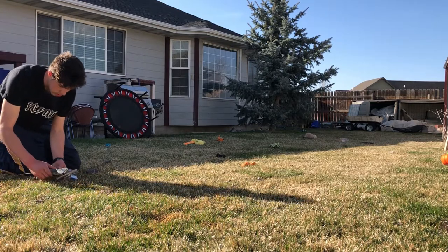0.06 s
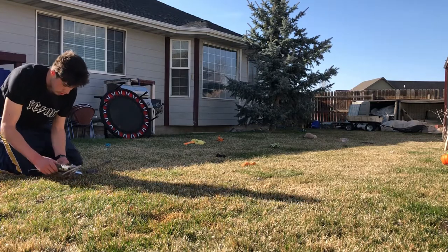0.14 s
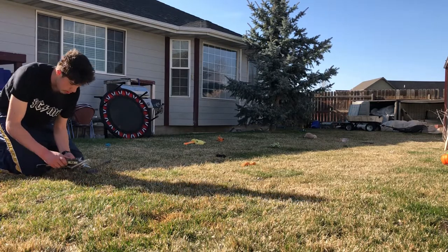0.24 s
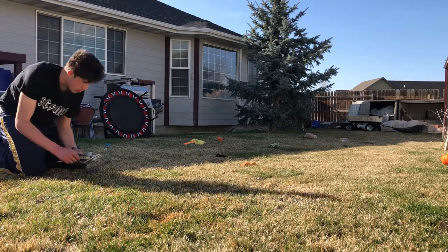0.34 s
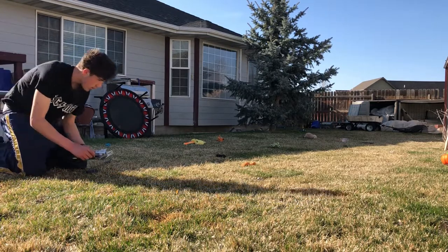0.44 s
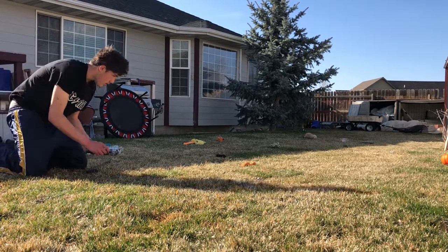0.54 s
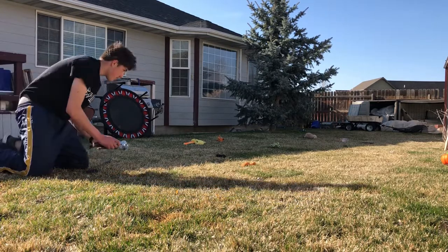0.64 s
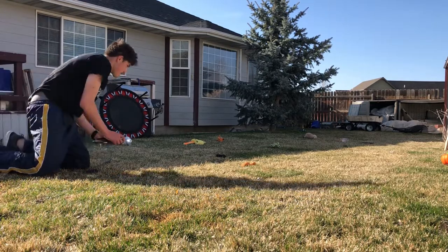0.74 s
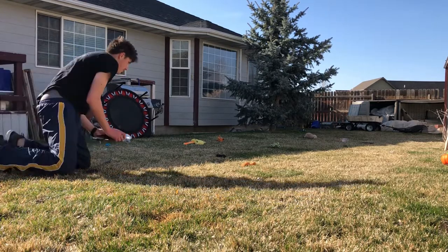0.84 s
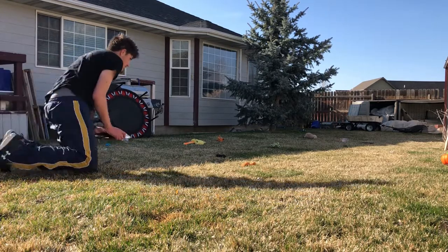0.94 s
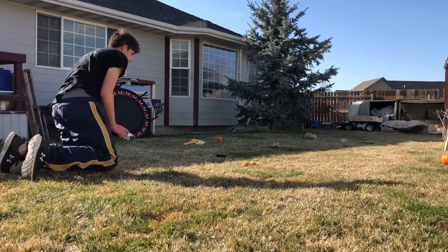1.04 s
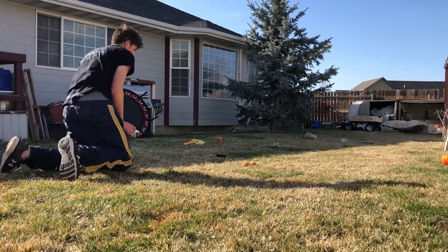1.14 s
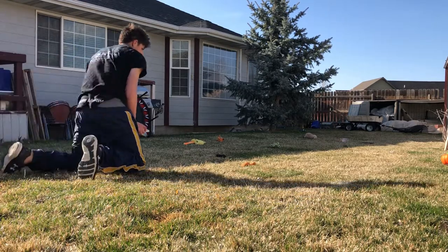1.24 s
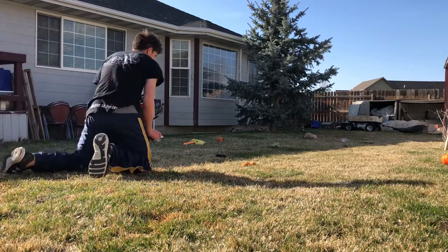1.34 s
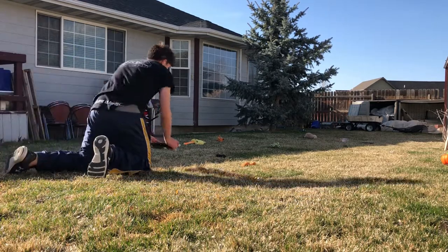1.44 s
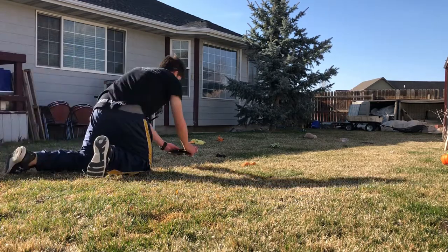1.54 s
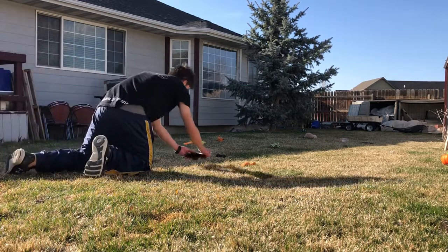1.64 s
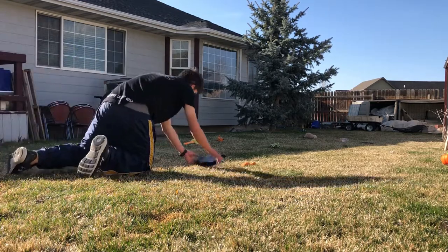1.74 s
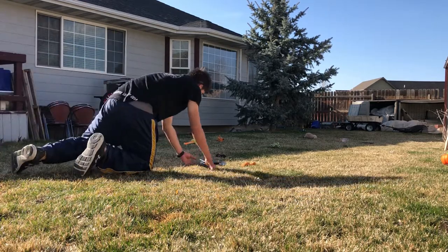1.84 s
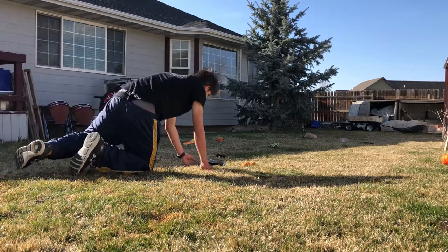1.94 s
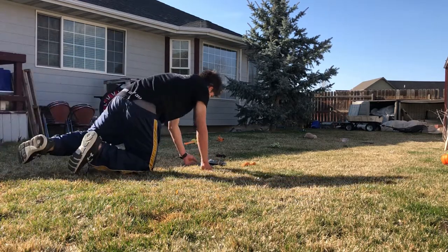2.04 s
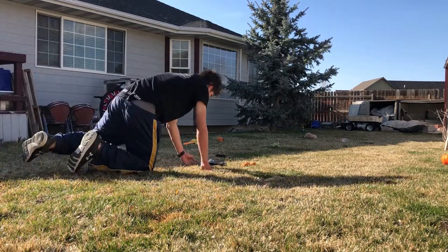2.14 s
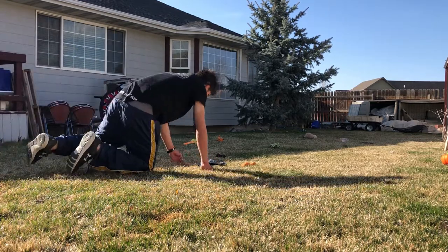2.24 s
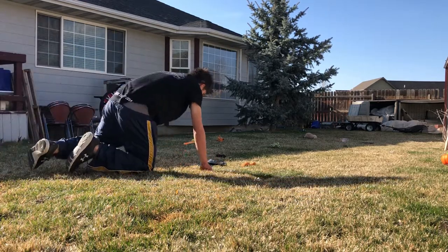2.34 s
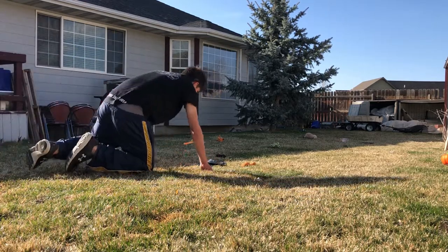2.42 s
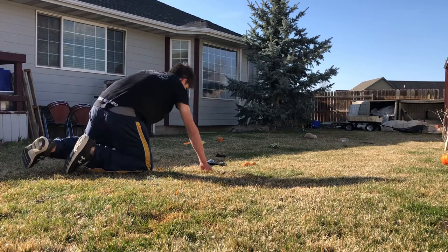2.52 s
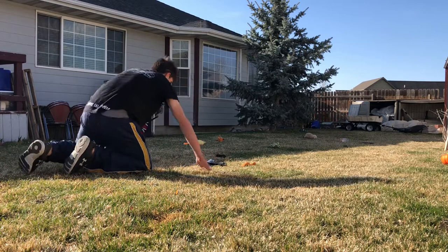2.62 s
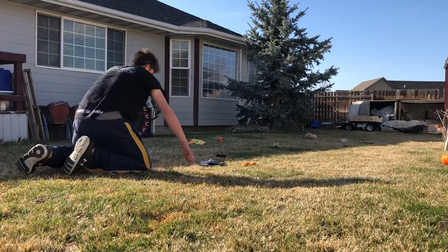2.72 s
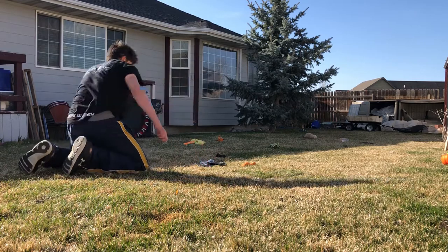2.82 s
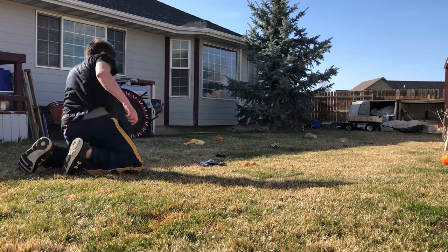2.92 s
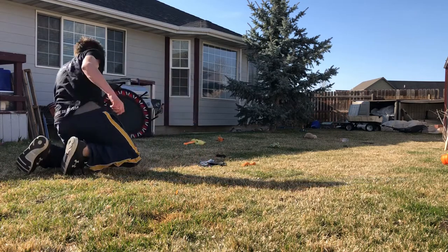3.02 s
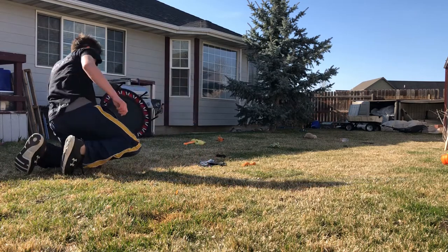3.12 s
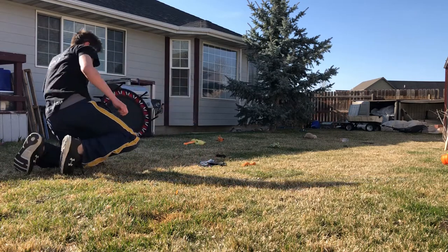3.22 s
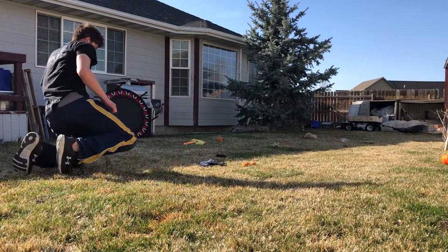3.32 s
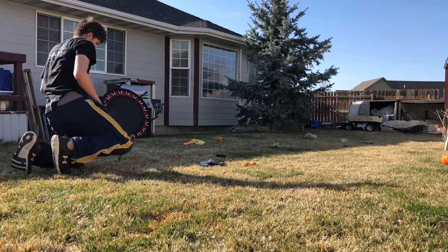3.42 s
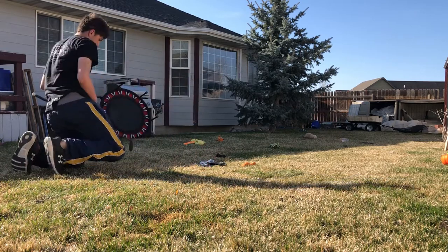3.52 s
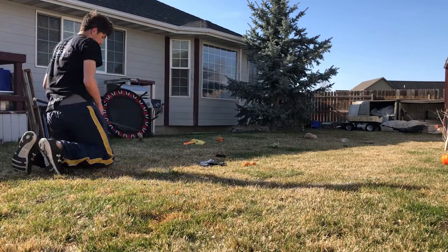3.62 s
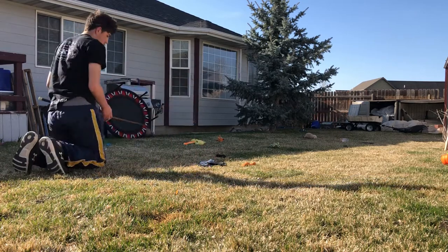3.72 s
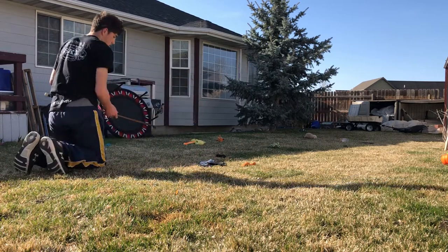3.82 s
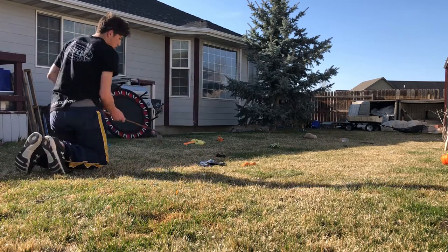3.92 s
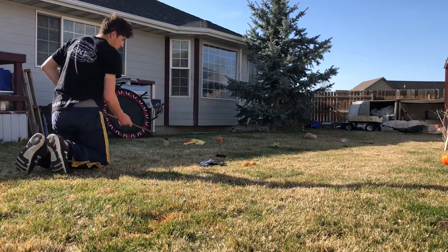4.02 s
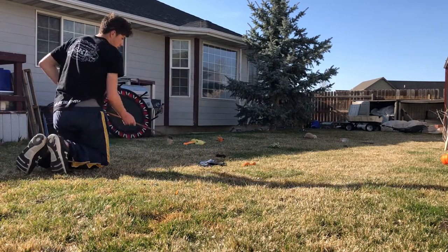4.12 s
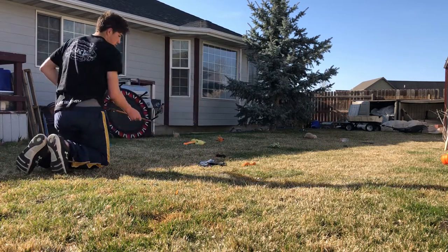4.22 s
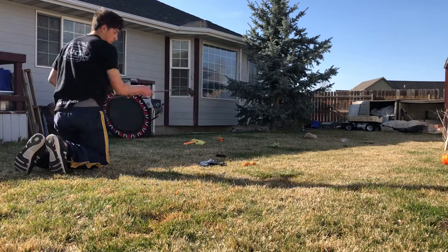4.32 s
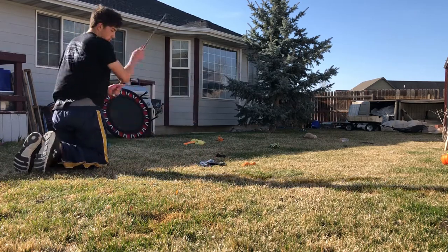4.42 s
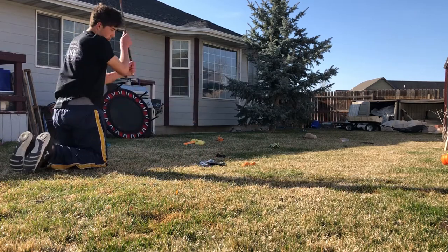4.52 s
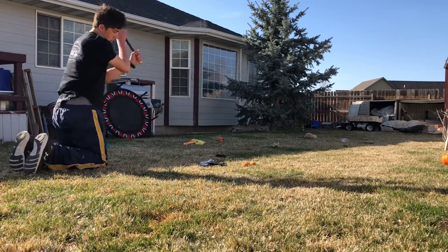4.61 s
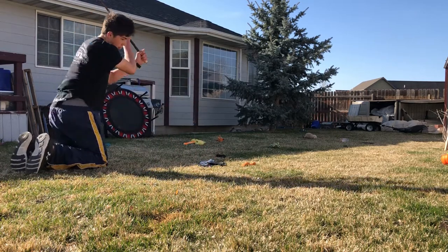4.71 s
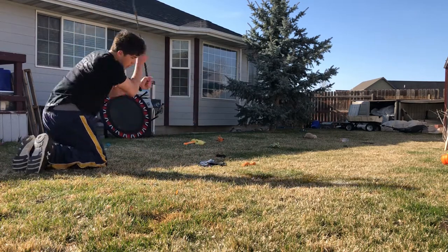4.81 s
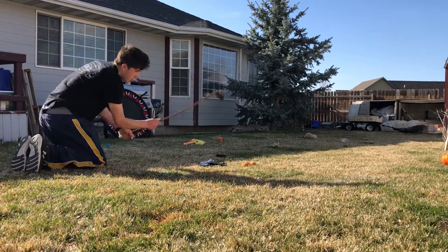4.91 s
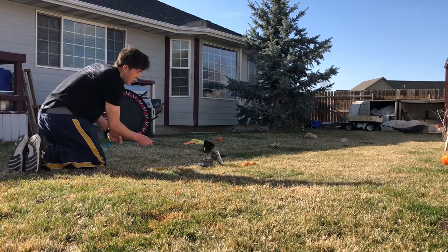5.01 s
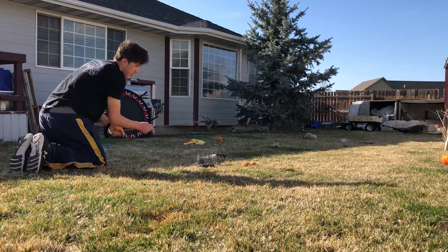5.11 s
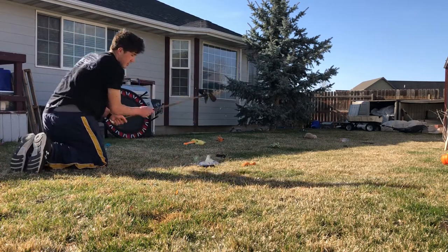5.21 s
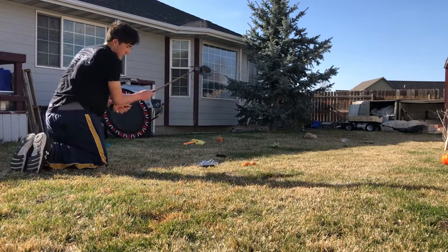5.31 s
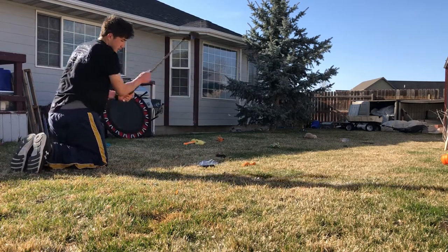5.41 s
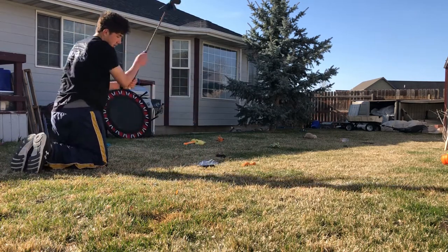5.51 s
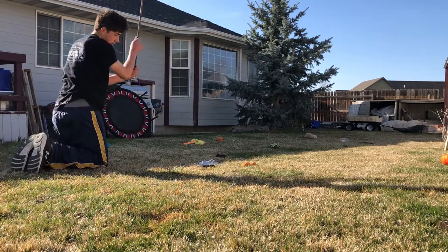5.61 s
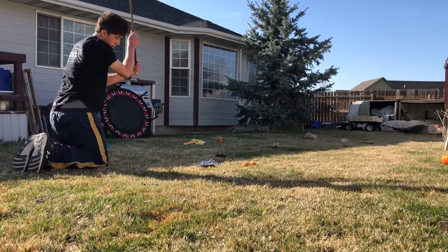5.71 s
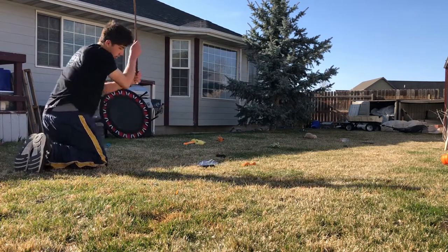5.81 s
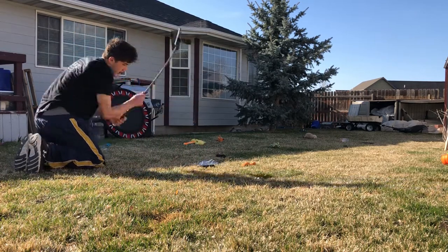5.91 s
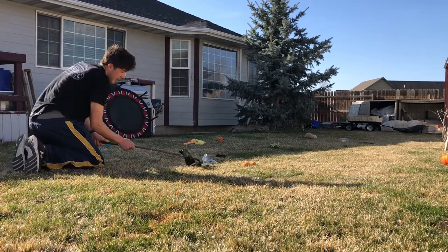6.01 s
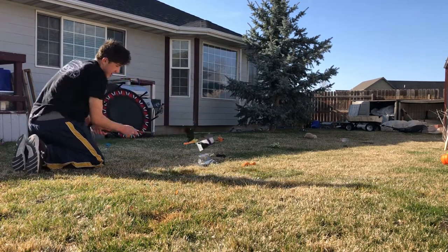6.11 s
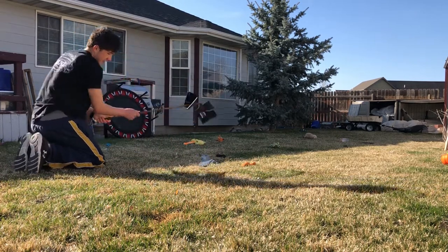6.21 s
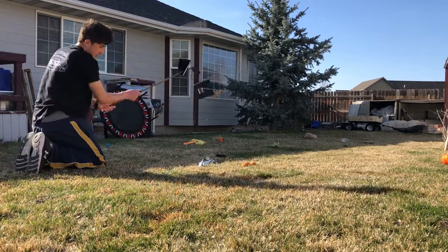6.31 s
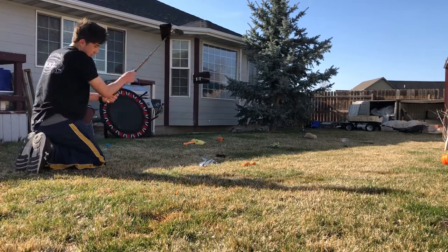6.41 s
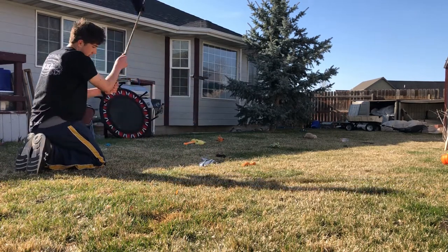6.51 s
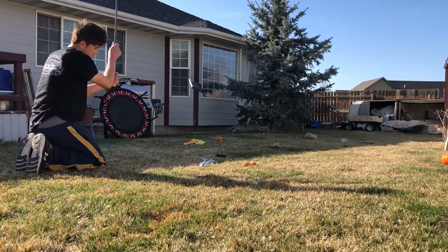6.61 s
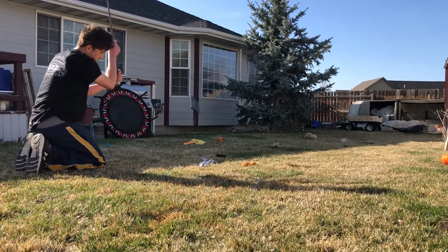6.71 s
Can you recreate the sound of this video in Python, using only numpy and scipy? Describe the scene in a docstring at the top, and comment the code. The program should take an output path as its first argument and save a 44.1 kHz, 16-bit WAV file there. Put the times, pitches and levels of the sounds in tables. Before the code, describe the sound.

Under a low droning propeller plane, someone shifts on dry grass, sets down a rattly gadget, then smashes it twice with sharp, crunching cracks.

```python
"""A golf club smashes a broken gadget twice on a back lawn: sharp noise bursts for the cracks, ringing shards
and turf for the crunch, damped tones for the hollow knocks and thuds.
Plastic pieces tick and ring, metal plates clink, and the house and fence send back echoes.
Behind, someone kneeling shifts on dry grass (shaped noise and tiny snaps), and a propeller plane drones
past overhead (sine waves tied to one sinking shaft speed, with coloured noise)."""
import sys
import numpy as np
from scipy import signal
from scipy.fft import rfft, irfft
from scipy.io import wavfile
from scipy.ndimage import map_coordinates

SR = 44100
rng = np.random.default_rng(int(sys.argv[2]) if len(sys.argv) > 2 else 0)


def int16_out(signal):
    """Quantize to a 16-bit WAV file."""
    q = np.round(np.clip(np.atleast_2d(signal).T, -1, 1) * 32767)
    wavfile.write(sys.argv[1], SR, q.astype(np.int16))


N = 297675
TIME = np.arange(N) / SR


def from_db(db):
    """Decibels to gain."""
    return 10 ** (np.asarray(db) / 20)


def rms_one(x):
    """Scale to unit power."""
    return x / np.sqrt(np.mean(x ** 2) + 1e-20)


def in_time(rows):
    """Read each column of a curve, sample by sample."""
    s, *columns = np.transpose(rows)
    return [np.interp(TIME, s, column) for column in columns]


def at_hz(points, hz):
    """Read a table on a log-frequency axis."""
    f, value = np.transpose(points)
    return np.interp(np.log(np.maximum(hz, 1)), np.log(f), value)


def colour(x, spectrum, size=8192):
    """Causal (minimum-phase) filter with the shape of the spectrum; white noise keeps its power."""
    gain = from_db(at_hz(spectrum, np.fft.rfftfreq(size, 1 / SR)))
    # folding the cepstrum forward in time makes the filter answer as early as it can
    cepstrum = irfft(np.log(gain))
    cepstrum[1:size // 2] *= 2
    cepstrum[size // 2 + 1:] = 0
    response = irfft(np.exp(rfft(cepstrum)))
    return signal.fftconvolve(x, response / np.linalg.norm(response))[:N]


def noise():
    """White noise of unit power."""
    return rng.standard_normal(N)


def drift(rate):
    """Smooth random wander of spread 1 with about `rate` turns a second."""
    coarse = TIME[::20]
    points = rng.standard_normal(N // 50)
    wander = map_coordinates(points, [coarse * rate], order=3, mode="wrap")
    return rms_one(np.interp(TIME, coarse, wander))


def grains(per_s, spread_db):
    """Random tiny snaps of uneven size, unit power."""
    sizes = from_db(spread_db * np.minimum(rng.exponential(1, N), 4))
    signs = rng.choice([-1, 1], N)
    happens = rng.random(N) < per_s / SR
    return rms_one(sizes * signs * happens)


def fall(age, t60):
    """Exponential fade that drops 60 dB in t60 seconds."""
    return np.exp(-np.log(1000) * age / t60)


def decay(start, t60, hold=0):
    """Envelope that jumps to 1, holds, then dies away."""
    age = TIME - start
    return (age >= 0) * np.exp(-np.log(1000) * np.clip((age - hold) / t60, 0, 2))


def add(track, s, piece):
    """Mix a short piece into a track at time s."""
    at = int(s * SR)
    track[at:at + len(piece)] += piece[:N - at]


def bursts(times, levels_db, t60s):
    """Each burst is a rush of noise that swells in a fraction of a millisecond and dies fast."""
    power, age = np.zeros(N), np.arange(SR // 10) / SR
    swell = 1 - np.exp(-age / 0.00018)
    for s, db, t60 in zip(times, levels_db, t60s):
        add(power, s, (from_db(db) * swell * fall(age, t60)) ** 2)
    return np.sqrt(power) * noise()


def ring(x, hz, t60):
    """One mode: a unit click sets a sine ringing, about 1 high at first."""
    r, w = np.exp(-np.log(1000) / (t60 * SR)), 2 * np.pi * hz / SR
    return signal.lfilter([0, np.sin(w)], [1, -2 * r * np.cos(w), r * r], x + 1e-18)


def resonate(x, modes, pitch=1, sustain=1):
    """Pass a force through modes, all scaled alike in pitch and ring time; white noise keeps its power."""
    click = np.zeros(SR // 5)
    click[0] = 1
    response = np.zeros(len(click))
    for k, (hz, t60, db) in enumerate(modes):
        tone = rms_one(ring(click, pitch * hz, sustain * t60))
        response += (-1) ** k * from_db(db) * tone
    return signal.fftconvolve(x, response / np.linalg.norm(response))[:len(x)]


def knock(hz, t60):
    """A well-damped tone pushed by a soft contact, which takes about half a cycle to build up."""
    age = TIME[:SR // 5]
    build_up = 1 - np.exp(-2 * hz * age)
    return np.sin(2 * np.pi * hz * age) * build_up * fall(age, t60)


def passing(top_db, loudest_s, steepness):
    """Level in dB of a sound that flies by in a straight line and falls off with distance."""
    pass_s = 1.484  # nearest distance over speed: how slowly the plane swells and fades
    distance = np.hypot(1, (TIME - loudest_s) / pass_s)
    return top_db - 20 * steepness * np.log10(distance)


def propeller(turn):
    """Blade tone, main drone and other engine lines, each wavering on its own in the moving air."""
    # main drone, the second blade harmonic: t/s, level/dB
    drone_curve = [(0, -73), (.8, -42), (1.15, -38.5), (1.47, -40), (1.67, -55.5), (1.87, -37), (2.12, -44),
                   (2.5, -37.5), (2.78, -45.5), (3.72, -44.5), (4.22, -63.5), (4.75, -60), (5.2, -57),
                   (6.75, -62)]
    # pass of the blade tone: level at its loudest/dB, t when loudest/s, steepness of the fade
    blade_pass = (-43.5, 2.2, 1.91)
    # other strong engine lines: shaft order, level at its loudest/dB, t when loudest/s, steepness of the fade
    engine_lines = [(3, -52, 2.2, 2.7), (3.2, -48, 1.1, 2.3), (5, -51.5, 1.75, 1.16), (6, -53, 0.46, 2.3)]
    blade_order, drone_order = 2, 4  # cycles per turn of the shaft
    # the blade tone also fades in and out slowly
    period_s, deepest_s, echo = 1.68, 1.89, 0.91
    drone_db, = in_time(drone_curve)
    cycle = np.exp(2j * np.pi * (TIME - deepest_s) / period_s)
    fade = np.abs(1 - echo * cycle) / (1 + echo)
    # the fades set in as the plane comes overhead
    fade = np.where(TIME > deepest_s - period_s / 2, fade, 1)
    lines = [(blade_order, passing(*blade_pass) + 20 * np.log10(fade)), (drone_order, drone_db)]
    for order, *flight in engine_lines:
        lines.append((order, passing(*flight) + 4.3 * drift(6)))
    out = np.zeros(N)
    for order, db in lines:
        out += from_db(db + 1.0 * drift(9)) * np.sin(order * turn + 0.08 * drift(14.0))
    return np.sqrt(2) * out


def plane():
    """Engine lines share one sinking (Doppler-shifted) shaft speed; rumble, rasp and rush are noise."""
    # shaft speed as heard, sinking as the plane passes: t/s, f/Hz
    shaft = [(0, 41.94), (1.45, 40.87), (1.9, 40.83), (3.4, 40.1), (4.0, 38.85), (5.4, 37.88), (6.75, 35.4)]
    # weaker exhaust lines: shaft order, level against the exhaust/dB
    exhaust_lines = [(3.5, -22), (4.5, -24), (5.5, -27), (6.4, -12), (7, -24.5), (7.7, -20), (8, -17.5)]
    # passes of the exhaust, its rasp and the thin whine, each beamed its own way; the rasp is beamed
    # backwards and heard just after the plane goes over: level at its loudest/dB, t when loudest/s, steepness
    exhaust_pass = (-45.5, 1.78, 1.29)
    rasp_pass = (-57.5, 2.76, 16)
    whine_pass = (-62, 2.3, 3.6)
    # air rushing round the plane: t/s, level/dB
    rush_curve = [(0, -54), (.9, -52), (1.5, -48), (2.15, -52), (2.8, -50.5), (3.4, -53.5), (4.25, -59),
                  (4.9, -60), (5.95, -61), (6.75, -68)]
    # tone colours of the noises: f/Hz, relative level per Hz/dB
    rumble_colour = [(20, -35), (45, -15.5), (70, -8.5), (100, -3.5), (135, -1), (220, -2), (270, -13),
                     (360, -25.5), (600, -23), (2000, -74.5)]
    rush_colour = [(100, 2), (350, 4.5), (600, -1), (830, 5.5), (1020, 3), (1170, 2.5), (1500, 0),
                   (2100, -6.5), (2850, -7), (3400, -14.5), (6000, -22.5), (16000, -45)]
    rasp_colour = [(700, -26), (1200, 4.5), (1700, 2.5), (2900, 1.5), (3500, -21), (4700, -6), (8000, -25)]
    # high shaft orders that carry the engine's buzz
    buzz_orders = (18, 20, 22, 23, 25, 28, 29, 30, 33, 35)
    whine_order = 29

    shaft_hz, = in_time(shaft)
    rush_db, = in_time(rush_curve)
    turn = 2 * np.pi * np.cumsum(shaft_hz) / SR
    exhaust = np.zeros(N)
    for order, db in exhaust_lines:
        exhaust += from_db(db + 4.0 * drift(4.22)) * np.sin(order * turn + 1.15 * drift(4.1))
    exhaust += colour(noise(), rumble_colour)
    exhaust *= from_db(passing(*exhaust_pass))
    # high orders swell and vanish in the turbulence: a faint buzz inside the rush
    buzz = rms_one(sum(drift(7) * np.sin(order * turn + drift(6)) for order in buzz_orders))
    air = colour(noise(), rush_colour) + from_db(-11) * buzz
    rush = from_db(rush_db + 0.72 * drift(14)) * air
    rasp = from_db(passing(*rasp_pass) + 1.9 * drift(24)) * colour(noise(), rasp_colour)
    whine_level = np.sqrt(2) * from_db(passing(*whine_pass) + 3.8 * drift(7.4))
    whine = whine_level * np.sin(whine_order * turn + 1.8 * drift(28))
    return propeller(turn) + exhaust + rush + rasp + whine


def grass():
    """Cloth hisses as the weight shifts, dry blades crackle, and now and then a stalk snaps."""
    # knees and clothes moving: t at the height of the move/s, relative level/dB, time to swell or fade/s
    moves = [(.25, -67.5, 0.061), (0.501, -63, 0.11), (.85, -63, 0.081), (1.19, -68.5, 0.12),
             (1.39, -62, 0.13), (1.84, -61, 0.058), (2.03, -67.5, 0.052), (2.66, -70, 0.26),
             (2.91, -56.5, 0.055), (3.03, -62, 0.028), (3.16, -67.5, 0.04), (3.31, -69.5, 0.056),
             (3.42, -70.5, 0.021), (3.745, -60.5, 0.045), (3.93, -71.5, 0.12), (4.49, -69, 0.094),
             (4.86, -71, 0.2), (5.25, -67, 0.086), (6.0, -71.5, 0.12), (6.35, -72, .07)]
    # tone colour of the rustle: f/Hz, relative level per Hz/dB
    rustle_colour = [(300, 7.5), (1500, 4), (3500, 1.5), (6000, 3), (9000, 1), (13000, -1), (16000, -4)]
    still_db = -81.5  # faint hiss between the moves, on the same relative scale
    power = np.full(N, from_db(still_db) ** 2)
    for middle, db, swell in moves:
        power += (from_db(db) / np.cosh((TIME - middle) / swell)) ** 2
    hiss = 1.55 * noise()
    crackle = 0.63 * grains(per_s=2200, spread_db=15.5)
    stalks = 0.147 * grains(per_s=33, spread_db=4.5)
    return np.sqrt(power) * colour(hiss + crackle + stalks, rustle_colour)


def yard(x):
    """A few wall slaps and a thin scattered tail with its own fading time in each band."""
    # how long scattered sound lingers: f/Hz, time to fade by 60 dB/s
    yard_t60 = [(200, 0.7), (1000, 0.3), (3000, 0.57), (6000, 0.45), (10000, 0.09), (16000, 0.29)]
    # echoes off the house and fence: delay/s, level/dB
    walls = [(0.0167, -24.5), (0.022, -20.5), (0.034, -29), (.069, -31), (0.113, -31)]
    age = TIME[:SR]
    response, edges = np.zeros(SR), np.geomspace(100, 18000, 10)
    for low, high in zip(edges, edges[1:]):
        band_filter = signal.butter(2, [low, high], "band", fs=SR, output="sos")
        band = signal.sosfilt(band_filter, rng.standard_normal(SR))
        response += band * fall(age, at_hz(yard_t60, np.sqrt(low * high)))
    response *= np.clip(age / 0.041, 0, 1)  # the scatter builds up over 41 ms
    response *= from_db(-16.0) / np.linalg.norm(response)
    for delay, db in walls:
        response[int(delay * SR)] += from_db(db)
    return signal.fftconvolve(x, response)[:N]


def metal():
    """Each plate landing rings and jingles until the grass damps it; chattering contact roughens the ring."""
    # small plates bouncing: t/s, relative level/dB, time until the grass stops the ring/s,
    # pitch ratio, ring against jingle/dB
    plate_landings = [(2.0055, -40, .007, 0.9, -13), (2.0115, -49, .005, 0.85, -17),
                      (2.04, -55, .006, 0.9, -14), (5.332, -29, 0.0066, 1.01, -19),
                      (5.3496, -19.5, 0.077, 1.006, -13), (5.377, -34, .03, 1, -13),
                      (5.53, -43, .006, 1, -16.5), (6.2805, -26.5, 0.0066, .965, -14.5)]
    # modes of a plate at pitch ratio 1: f/Hz, relative level/dB, time to fade by 60 dB when free/s
    plate_modes = [(4470, -23.5, .5), (5000, -17, .5), (5730, -17, .09), (6000, -3, .06), (6070, 6, 0.09),
                   (6220, -22, .2), (7477, -20, .45), (8500, -14, .14), (9240, -16, .17), (9260, -8, 0.2),
                   (9800, -17, .2), (10300, -6, .18), (10900, -15, .25), (13200, -10, 0.2),
                   (13394, -9, 0.19), (14013, -14, .15), (15150, -12, .14), (15455, -11, .14)]
    out, age = np.zeros(N), TIME[:SR // 3]
    jingle_colour = [(1500, -9.5), (3500, -3.5), (5500, 4.0), (8000, 3.5), (13000, 6.0), (16000, -4)]
    jingle = colour(noise(), jingle_colour)
    hz, mode_db, t60 = np.transpose(plate_modes)[:, :, None]
    chatter = 1 + .12 * drift(400)
    for start, db, free, pitch, ring_db in plate_landings:
        # every landing excites the modes a little differently
        uneven_db = mode_db + rng.standard_normal(hz.shape)
        strength = from_db(uneven_db + ring_db) * rng.choice([-1, 1], hz.shape)
        tones = np.sum(strength * np.sin(2 * np.pi * pitch * hz * age) * fall(age, t60), axis=0)
        damping = decay(0, 0.064, hold=free)[:len(age)]
        add(out, start, from_db(db) * tones * damping)
        tick_and_tail = from_db(-13.5) * decay(start, 0.04) + from_db(-24.0) * decay(start, 0.27)
        out += from_db(db) * jingle * decay(start, 0.13, hold=free) * tick_and_tail
    return out * chatter


def plastic():
    """Ticks ring at their own pitches, two as wall echoes; the shell scrapes and loose parts chatter."""
    # pieces knocking and landing; the ticks at 5.1345 and 6.1665 s are echoes of the blows off a wall:
    # t/s, relative level/dB, body against treble/dB, time for the tick to fade by 60 dB/s, pitch ratio
    clacks = [(1.813, -40, -20, 0.046, 1), (1.824, -30.5, -24, .04, 1), (1.8308, -28.5, -33, .039, 1),
              (1.8405, -25.5, -12, 0.018, .93), (1.8465, -25, -13, .015, 0.98),
              (1.8685, -25, -5.5, 0.019, 1.05), (1.8755, -32, -9, .02, 1.03), (1.895, -39, -24, .023, 1),
              (1.9125, -38, -18, .015, 1), (1.951, -42.5, -1, .015, .9), (1.9796, -33, -30, 0.015, 1),
              (2.0042, -36, -30, 0.023, 1), (2.039, -44, -26, .025, 1), (5.0655, -21, -8, .015, 0.82),
              (5.0914, -26.5, -7, 0.019, 1.1), (5.1345, -36, -2.5, .035, 1.25),
              (5.2445, -33, -18, 0.037, 1), (5.3148, -36, -18, 0.074, 1.2),
              (5.9218, -24.5, -11.5, 0.021, .97), (5.986, -47, -1.5, 0.022, .95),
              (6.03, -38.5, -7, .015, 1), (6.123, -34, -14, .014, 1), (6.1665, -34, -10, .012, 1.1),
              (6.189, -40, -7, .01, 1), (6.2112, -25.5, -7.5, 0.017, 1.15), (6.2148, -25, -12, 0.01, 1.05),
              (6.237, -35, -4, .012, 1.13), (6.25, -45, -3, 0.011, 1.1), (6.2612, -35, -4.5, 0.012, 1),
              (6.2695, -33, -7, .012, .97), (6.2794, -24, -16, 0.033, 1.1), (6.288, -31, -20, .014, 1.3),
              (6.392, -45, -30, .025, 1)]
    # loose parts chattering as the shell is set down, kicked up by the club and tumbling through the air:
    # t/s, level/dB, length/s, time to fade by 60 dB after that/s
    rattles = [(1.81, -58, 0.096, 0.2), (6.076, -35.5, 0.019, 0.076), (6.156, -49, 0.135, 0.03)]
    # shell dragging through stiff grass as it is set down: t at the hardest push/s, level/dB,
    # time to swell or fade/s
    scrapes = [(1.842, -49, 0.012), (1.895, -59, 0.034)]
    # modes of the loose shell, before pitch and ring-time ratios: f/Hz, time to fade by 60 dB/s,
    # relative level/dB
    shell = [(527, .045, 2), (1010, .009, 1.5), (1706, 0.024, 8), (1940, 0.011, 3.5), (2224, .016, 3),
             (2590, 0.015, 3), (3290, 0.02, -1), (3710, 0.015, 3.5), (4320, 0.018, -1), (5560, .006, 0)]
    # tone colours of the ticks and the scrape: f/Hz, relative level per Hz/dB
    clack_colour = [(1500, -29.5), (3000, 1.5), (4500, 7), (6500, 9), (9000, 7.5), (13000, 2), (16000, 1.5)]
    scrape_colour = [(400, -14), (1100, 2), (1800, -1), (3500, -2), (5500, -4), (9000, -5), (16000, -9)]
    free_ring = 2.1  # clear of the grass, the shell rings this many times longer

    s, db, _, t60s, _ = np.transpose(clacks)
    out = colour(bursts(s, db - 7.5, t60s), clack_colour)
    shaking = np.zeros(N)
    for start, level_db, length, t60 in rattles:
        shaking += from_db(level_db) * decay(start, t60, hold=length)
    out += resonate(shaking * grains(per_s=300, spread_db=3.0), shell, sustain=free_ring)
    push = np.zeros(N)
    for middle, level_db, swell in scrapes:
        push += from_db(level_db) / np.cosh((TIME - middle) / swell)
    out += push * colour(grains(per_s=4300, spread_db=2.0), scrape_colour)
    age = TIME[:SR // 8]
    for start, peak_db, body_db, t60, pitch in clacks:
        fading = from_db(peak_db + body_db + 0.5) * fall(age, t60)
        force = fading * rng.standard_normal(len(age))
        add(out, start, resonate(force, shell, pitch))
    return out


def shards(start, length, count=110):
    """Each shard snaps off at its own moment, pitch and strength; the late ones tend to be weaker."""
    low_hz, high_hz, t60_s = 1101, 12000, .03
    level_db, spread_db = -4.5, 9  # level against the splinters, and how far it strays either way
    span_s = .13  # they keep snapping for this long
    # they weaken as the club slows, and faster still once it has stopped (dB per s)
    slowing_db_per_s, stopped_db_per_s = 109.5, 167.5
    out = np.zeros(N)
    for moment, size, strength in rng.random((count, 3)):
        delay = span_s * moment
        hz = low_hz * (high_hz / low_hz) ** size
        fade_db = slowing_db_per_s * delay + stopped_db_per_s * max(delay - length, 0)
        db = level_db + spread_db * (2 * strength - 1) - fade_db
        add(out, start + delay, from_db(db) * knock(hz, t60_s))
    return out


def knocks():
    """Damped tones: the casing knocks hollow at shifting pitches, once as an echo; the ground stops the club."""
    # hollow knocks of the casing under the club head, and a faint echo of the first blow off a wall
    # at 5.135 s: t/s, level/dB, f/Hz, time to fade by 60 dB/s
    hollows = [(5.0235, -19, 555, 0.018), (5.0645, -23, 785, 0.031), (5.135, -39, 720, 0.035),
               (5.9214, -29, 761, 0.018), (6.055, -28.5, 697, 0.012), (6.0775, -23, 640, 0.016)]
    # modes of that knock: multiple of the pitch, relative level/dB
    hollow_modes = [(1, 0.5), (1.5, -5), (1.96, -6.5), (4.85, -19.5)]
    # club head stopped by the ground: t/s, level/dB, f/Hz, time to fade by 60 dB/s
    thuds = [(5.04, -24.5, 136, .07), (6.072, -14, 101.3, 0.047)]
    out = np.zeros(N)
    for s, db, hz, t60 in hollows:
        for multiple, mode_db in hollow_modes:
            add(out, s, from_db(db + mode_db) * knock(multiple * hz, t60))
    for s, db, hz, t60 in thuds:
        add(out, s, from_db(db) * knock(hz, t60))
    return out


def club():
    """Swish, crack of the casing, then the crunch and thud of the head digging in."""
    # club head breaking the casing: t/s, level/dB, time for the crack to fade by 60 dB/s,
    # level of the dull knock/dB
    cracks = [(5.0228, -0.5, 0.009, -23), (5.026, -14.5, 0.025, -27.5), (6.053, -7, 0.016, -27),
              (6.056, -20, 0.012, -30), (6.0657, -21, 0.02, -32.5), (6.0715, -13.5, 0.026, -38),
              (6.076, -15.5, 0.012, -24)]
    # splinters and turf crushed under the club: t/s, splinter level/dB, length/s, turf level/dB,
    # earth thud level/dB
    crunches = [(5.038, -29.5, 0.044, -38, -41.5), (6.063, -27, 0.037, -37.5, -32)]
    # the downswing: t of the impact/s, level/dB
    swings = [(5.023, -47), (6.052, -45.5)]
    # hollow tones of the casing pressed into the turf: f/Hz, time to fade by 60 dB/s, relative level/dB
    turf_tones = [(152, 0.048, -11), (245.2, 0.054, 5), (347, 0.077, -0.5), (510, 0.0896, -8.5),
                  (660, 0.0099, 0.5), (860, 0.03, 0), (1120, 0.027, -9)]
    # tone colours of the crack, dull knock, splinters and earth thud: f/Hz, relative level per Hz/dB
    crack_colour = [(200, -27), (1000, -19.5), (2300, -16.5), (4000, -1), (5500, 3.5), (6800, 3),
                    (9000, 3.5), (13000, -2.5), (16000, 2.5)]
    knock_colour = [(60, -25.5), (250, -19.5), (520, 0), (800, -1.5), (1300, -8.5), (2500, -7),
                    (8000, -35.5)]
    splinter_colour = [(200, -10), (600, 1), (950, -8), (1400, -10), (2200, 2.5), (3000, 4.5), (5800, 6),
                       (9000, 3), (13000, 4), (16000, -6)]
    thud_colour = [(20, -41.5), (45, -19), (75, 7), (140, 1), (250, -1.5), (400, -22.5), (1200, -45)]

    s, crack_db, t60, knock_db = np.transpose(cracks)
    out = colour(bursts(s, crack_db, t60), crack_colour)
    out += colour(bursts(s, knock_db, 2.6 * t60), knock_colour)  # the dull knock lasts longer
    splinters = colour(grains(per_s=3000, spread_db=1.5), splinter_colour)
    turf = resonate(grains(per_s=1200, spread_db=5.5), turf_tones)
    earth = colour(noise(), thud_colour)
    for start, splinter_db, length, turf_db, thud_db in crunches:
        crushing = decay(start, 0.24, hold=length) * decay(start, 0.56)
        out += from_db(splinter_db) * crushing * splinters
        out += from_db(splinter_db) * shards(start, length)
        out += from_db(turf_db) * decay(start, 0.089, hold=1.07 * length) * turf
        out += from_db(thud_db) * decay(start, 0.16, hold=0.019) * earth
    air = colour(noise(), [(100, -14.0), (500, 3.0), (1500, -11.5), (4000, -15.5), (16000, -22.0)])
    for impact, db in swings:
        out += from_db(db) * np.exp(-np.abs(TIME - impact) / 0.022) * air
    return out


def scene():
    """The blows carry to the walls; the plates, low in the grass, reach them more weakly."""
    hits = club() + knocks() + plastic()
    clinks = metal()
    echoes = yard(hits + from_db(-5.5) * clinks)
    return (hits + clinks + echoes + grass() + plane())[None]


def record(dry):
    """The microphone drops the deepest bass, the loudest peaks are rounded and the top is cut."""
    cutoff_hz, peak_limit = 15900, .62
    heard = signal.sosfilt(signal.butter(2, 42, "high", fs=SR, output="sos"), dry)
    rounded = peak_limit * np.tanh(heard / peak_limit)
    return signal.sosfilt(signal.ellip(10, .1, 80, cutoff_hz, fs=SR, output="sos"), rounded)


dry = scene()
out = record(dry)
int16_out(out)
```